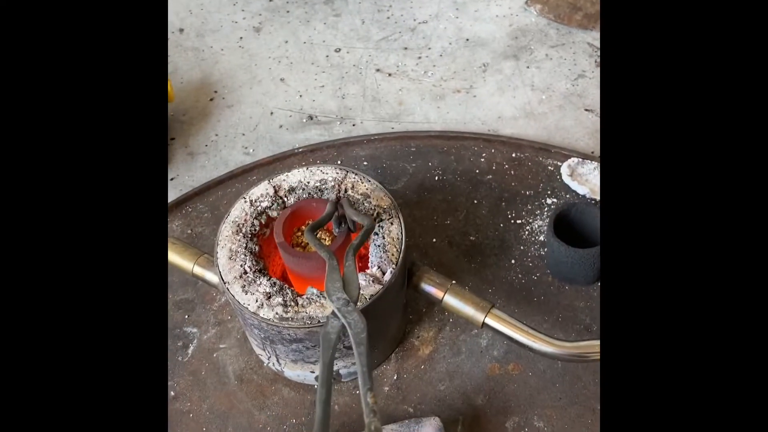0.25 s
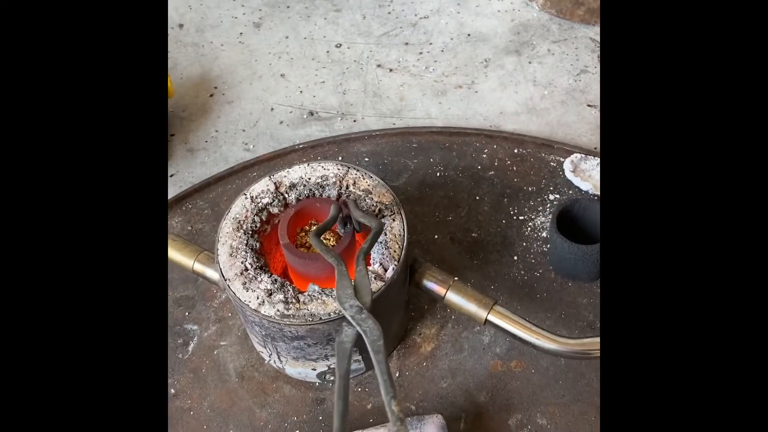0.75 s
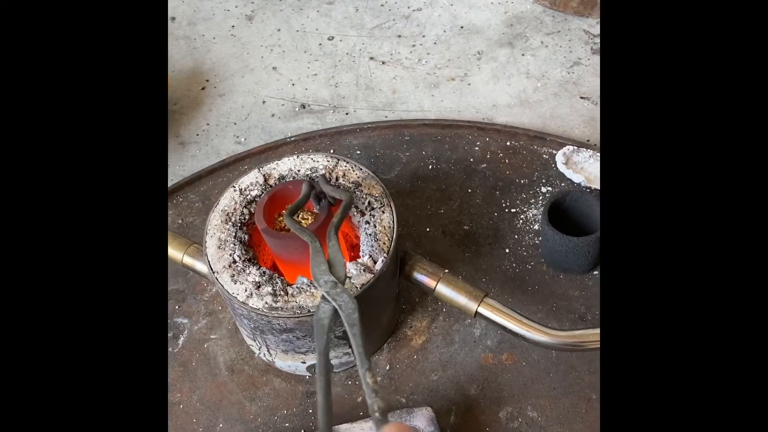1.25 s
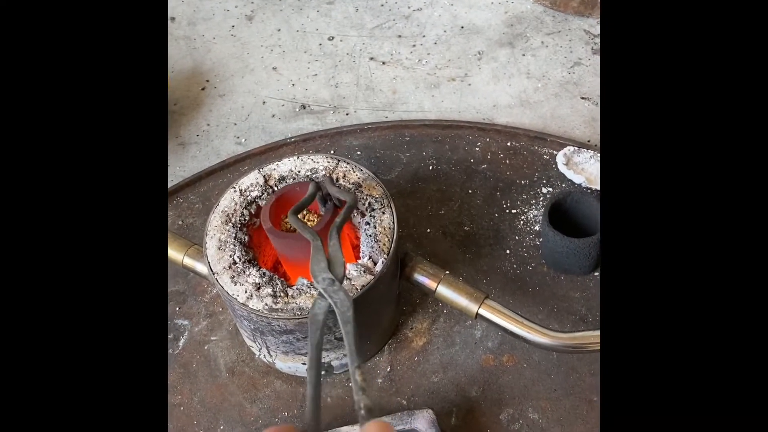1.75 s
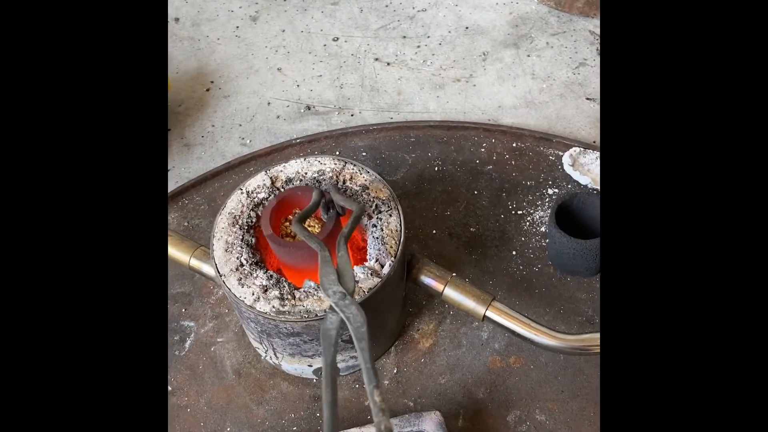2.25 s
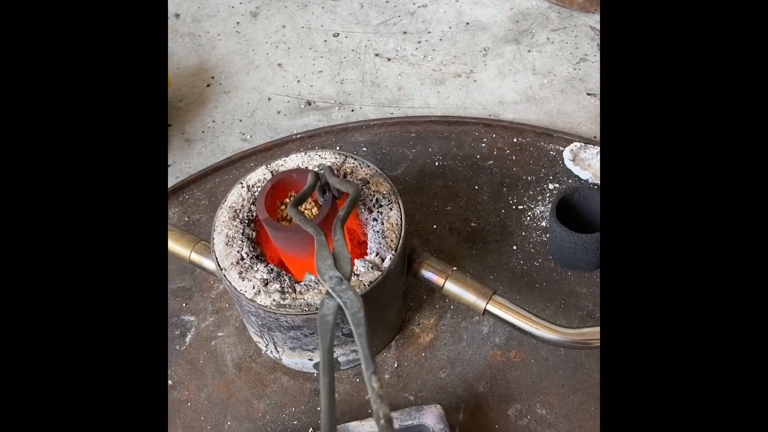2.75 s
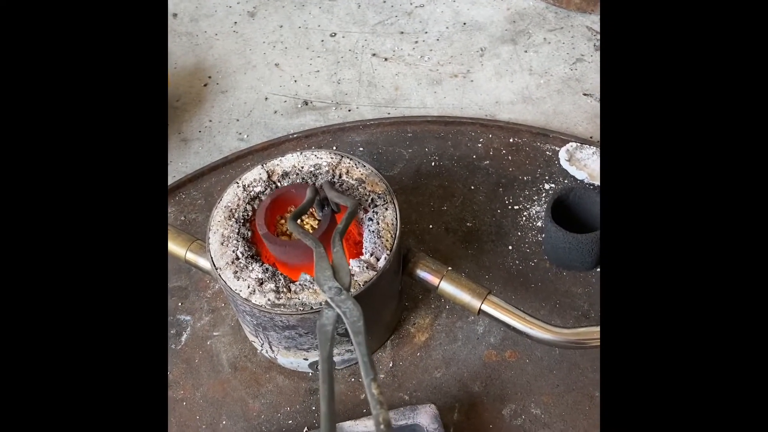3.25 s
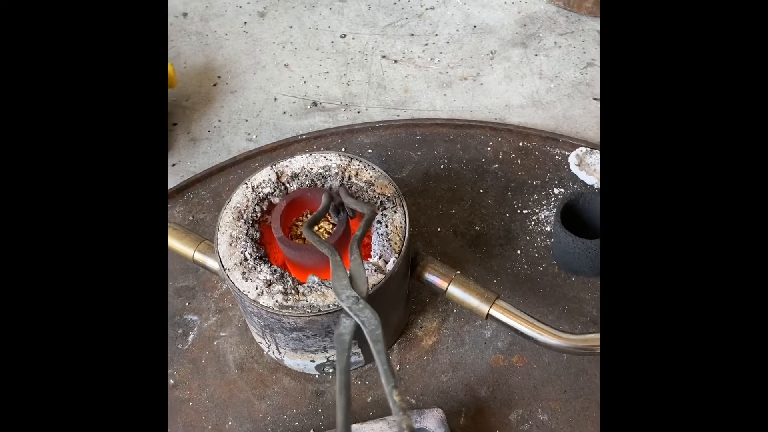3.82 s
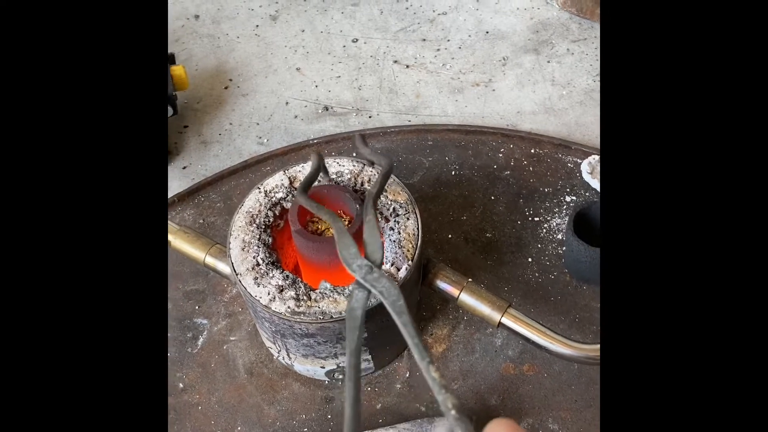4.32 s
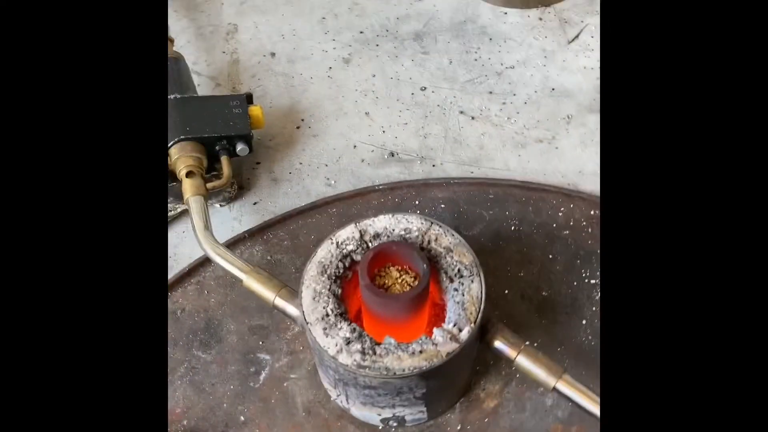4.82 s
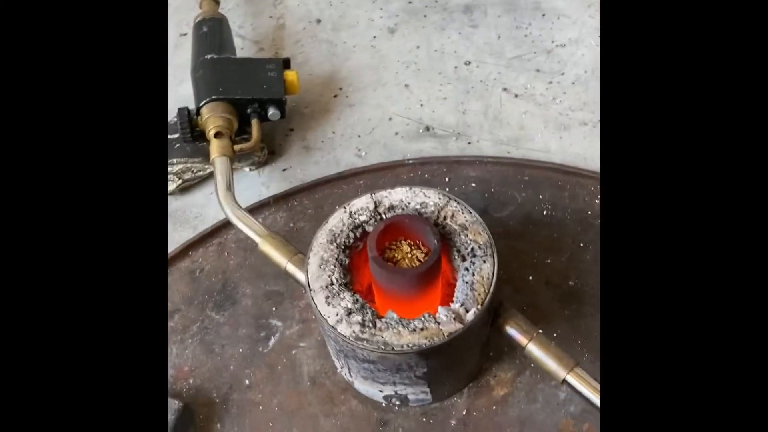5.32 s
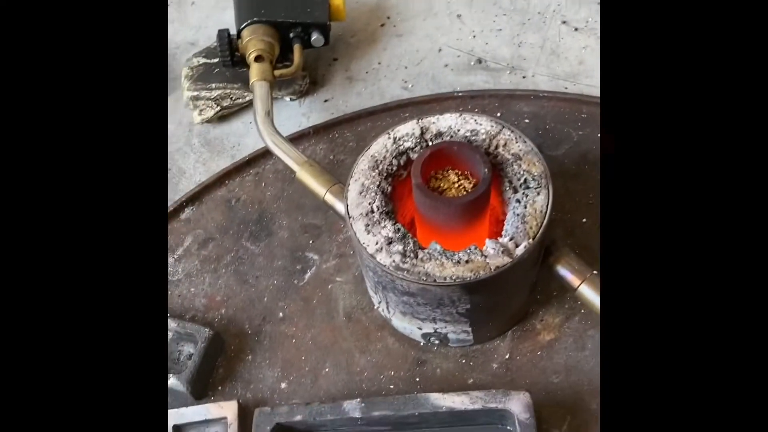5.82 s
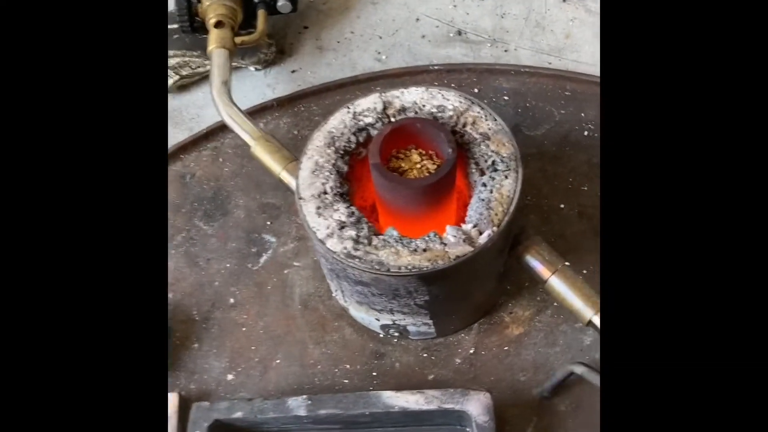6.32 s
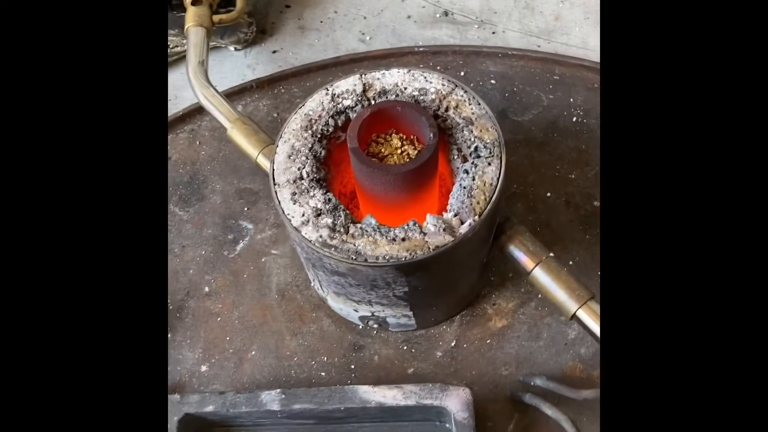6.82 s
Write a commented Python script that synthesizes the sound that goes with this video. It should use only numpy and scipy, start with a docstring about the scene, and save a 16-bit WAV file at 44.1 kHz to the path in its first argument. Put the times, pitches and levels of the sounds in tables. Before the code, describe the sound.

Sparse gritty clicks of metal on clay, an engine droning past outside, then tongs clank down hard and slide on a steel sheet.

```python
"""In a small workshop, close to a gas furnace, steel tongs work at a clay crucible, then drop on a steel sheet.
Contacts are bursts of rough force: filtered they snap, and through damped modes clay, sheet and tongs ring.
Heavy blows thud in the stand; rubbing and sliding are dense clicks; a faint hiss swells and rises in pitch.
Coloured noise is the rumble and roar of flame, traffic and handling; engines drone past outside as unsteady
sines, and a faint tone wavers. Things close by and the walls answer the near sounds at two microphone ports."""
import sys
import numpy as np
from scipy import signal
from scipy.fft import rfft, irfft, next_fast_len
from scipy.io import wavfile

SR = 44100
rng = np.random.default_rng(int(sys.argv[2]) if len(sys.argv) > 2 else 0)


def ratio(d):
    """dB to gain"""
    e = np.asarray(d, float) / 20
    return 10 ** e


def store_wav(level_fs):
    """Save 16-bit WAV to argv[1]."""
    pcm = np.round(np.clip(np.atleast_2d(level_fs), -1, 1) * 32767)
    wavfile.write(sys.argv[1], SR, pcm.T.astype(np.int16))


N = 311787

# modes of the steel sheet and the tongs on it: pitch_hz, level_db, t60_s
STEEL_MODES = [(450, -10, .03), (620, 1, .04), (780, -4, .03), (950, -3, .035), (1165, -2, .035),
               (1310, -5, .03), (1450, -4, .035), (1580, -5, .03), (1712, -6, .035), (1836, -6, .035),
               (2100, -8, .03), (2360, -8, .03), (2740, -7, .025), (3200, -8, .03), (3540, -5, .045),
               (3690, -7, .03), (3866, -6, .035), (4120, -6, .03), (4500, -5, .03), (5170, -8, .02),
               (6310, -3, .025), (6424, 0, .03), (6545, -4, .025), (7200, -3, .03), (8005, -5, .025),
               (8371, -6, .025), (8565, -3, .03), (9243, -4, .03), (9420, -6, .025), (9800, -7, .02),
               (10250, -8, .02)]
# tongs sliding on the sheet: time_s, ringing_slips_db, grit_db
SLIDE_LEVELS = [(5.38, -63, -37.5), (5.45, -60, -46), (5.52, -62, -49.5), (5.58, -47, -40.5),
                (5.7, -48, -52), (5.76, -55, -50.5), (5.87, -59, -62.5), (6.05, -60, -60),
                (6.1, -40.5, -56), (6.17, -50, -46), (6.24, -54.5, -60), (6.31, -51, -58),
                (6.36, -48, -54.5), (6.45, -56.5, -49), (6.63, -41.5, -38), (6.77, -47.5, -49),
                (6.93, -74, -52.5), (7.07, -37, -49)]
# colour of the snap of a contact: pitch_hz, level_db
CRACK_COLOUR = [(300, -11), (1500, -30), (2500, 8), (3400, 13), (4500, 9), (6000, 4), (9000, 6),
                (16000, -9.5)]


def rms_one(x):
    """Scale to unit rms."""
    return x / np.sqrt(np.mean(x ** 2) + 1e-20)


def in_time(rows):
    """Columns of a curve at every sample."""
    s, *columns = np.transpose(rows)
    return [np.interp(np.arange(N) / SR, s, c) for c in columns]


def fade(rows, s):
    """1 while a curve lasts, 0 outside, with ramps of s seconds."""
    t = np.arange(N) / SR
    return np.clip(np.minimum(t - rows[0][0], rows[-1][0] - t) / s, 0, 1)


def filtered(x, response):
    """Multiply the spectrum by response(Hz)."""
    size = next_fast_len(x.shape[-1])
    hz = np.arange(size // 2 + 1) * SR / size + 1  # 1 Hz up, so that a logarithm exists
    return irfft(rfft(x, size) * response(hz), size)[..., :x.shape[-1]]


def at_hz(points, hz):
    """Read a table on a log-frequency axis."""
    table_hz, values = np.transpose(points)
    return np.interp(np.log(hz), np.log(table_hz), values)


def coloured(x, spectrum):
    """Give a sound the colour of a (Hz, dB) table."""
    return filtered(x, lambda hz: ratio(at_hz(spectrum, hz)))


def drift(rate):
    """Slow chance: straight lines between random knots of spread 1, about 2 * rate of them a second."""
    knots = rng.standard_normal(int(N / SR * rate * 2) + 2)
    return np.interp(np.linspace(0, len(knots) - 1, N), np.arange(len(knots)), knots)


def grains(per_s):
    """Dense tiny clicks in clumps."""
    sizes = ratio(3.3 * np.minimum(rng.exponential(1, N), 5)) * rng.choice([-1, 1], N)
    chance = per_s * ratio(4.0 * drift(40)) / SR
    return sizes * (rng.random(N) < chance) + 1e-18


def blows(times, db):
    """One click of either sign for each time."""
    out = np.full(N, 1e-18)
    out[np.round(times * SR).astype(int)] = ratio(db) * rng.choice([-1, 1], len(times))
    return out


def contacts(times, gains, t60s):
    """Each contact is a burst of rough force that swells quickly and dies away."""
    out = np.full(N + SR, 1e-18)
    for s, gain, t60 in zip(times, gains, np.clip(t60s, .002, .2)):
        t = np.arange(int(t60 * SR)) / SR
        shape = (1 - np.exp(-t / (.025 * t60))) * ratio(-60 * t / t60)
        i = round(s * SR)
        out[i:i + len(t)] += gain * rng.standard_normal(len(t)) * shape / shape.max()
    return out[:N]


def ring(force, hz, t60):
    """A damped mode: a unit click sets a sine of starting height 1 ringing."""
    r, w = ratio(-60 / (t60 * SR)), 2 * np.pi * hz / SR
    return signal.lfilter([0, np.sin(w)], [1, -2 * r * np.cos(w), r * r], force)


def favour(hz, favoured_hz):
    """The spot that is hit favours modes near a pitch: up to 12 dB, with a width of .06 in log pitch."""
    return 12 * np.exp(-.5 * (np.log(hz / favoured_hz) / .06) ** 2)


def struck(modes, times, peak_db, t60s, spread_db, favoured_hz=1):
    """Every contact drives every mode with a strength of its own; longer contacts add up in power."""
    # short contacts also deliver one clean blow, a share that fades with their length
    clean_db = 20 * np.log10(0.45 * np.exp(-t60s / 0.046))
    out = 0
    for hz, level_db, t60 in modes:
        db = peak_db + level_db + favour(hz, favoured_hz) + rng.normal(0, spread_db, len(times))
        gains = ratio(db) / np.sqrt(1 + np.minimum(t60s, t60) * SR / 14)
        force = contacts(times, gains, t60s) + blows(times, db + clean_db)
        out = out + ring(force, hz, t60)
    return out


def crack(times, peak_db, t60s, spectrum):
    """The broad snap of the contact itself: one sharp click, then grains about a millisecond long."""
    gritty = ratio(4 * drift(500) - 2)
    force = gritty * contacts(times, ratio(peak_db), t60s)
    click_db = 12  # re the rough force
    force[np.round(times * SR).astype(int)] += ratio(peak_db + click_db)
    return coloured(force, spectrum)


def tongs_on_clay():
    """Ticks and short scrapes: the harder the touch, the less the crucible rings and the brighter the edge."""
    # tongs touching clay: start_s, level_db (before the shares below), hardness (0-1), t60_s
    ticks = [(0.124, -48.5, 0.56, 0.1), (.15, -54, 0.43, .1), (0.226, -54.5, 0.27, 0.13),
             (0.323, -53.5, 0, 0.086), (0.341, -52, 0.34, 0.074), (0.401, -48, .05, 0.054),
             (0.418, -52, .05, 0.048), (0.566, -52, 0.36, 0.14), (0.778, -56, 0.98, 0.041),
             (0.973, -43.5, 0.8, 0.0086), (1.167, -22.5, 0.94, 0.0042), (1.184, -39.5, 0.65, 0.011),
             (1.214, -52, 0.44, 0.14), (1.281, -56, 0.37, 0.16), (1.327, -52, 0.57, 0.18),
             (1.367, -52, 0, 0.071), (1.427, -53, 0.28, 0.041), (1.58, -47.5, 0.86, 0.019),
             (1.648, -36.5, 0.42, 0.062), (1.676, -49, 0.82, 0.09), (1.691, -41, 0.74, 0.13),
             (1.877, -47.5, 0.74, 0.083), (1.936, -50.5, 0.43, 0.12), (2.088, -53.5, 0.52, 0.13),
             (2.246, -29.5, 0.56, 0.024), (2.317, -35, 0.46, 0.044), (2.387, -45.5, 0.78, 0.0085),
             (2.701, -43.5, 0.12, 0.032), (2.805, -39, 0.1, 0.076), (2.813, -26.5, 0.28, 0.036),
             (2.83, -32, 0.47, 0.074), (3.3, -39.5, 0.74, 0.016), (3.354, -28, 0.37, 0.053),
             (3.368, -46, 0.65, 0.088), (3.658, -50.5, 0.74, 0.058), (3.779, -51, 0.5, 0.096),
             (3.843, -53.5, 0.46, .022), (3.97, -22.5, 0.91, 0.0052), (3.99, -48.5, 0.87, .15),
             (4.1844, -31, 0.85, 0.0099), (4.261, -45, 0.97, 0.005), (4.405, -40, 0.9, 0.0043),
             (4.407, -24.5, 1, 0.022), (4.568, -59, 0.68, .015), (4.854, -66, 0.56, 0.015),
             (4.942, -55, 0.63, 0.041), (5.088, -55, 1, .012), (5.2, -55.5, 0.8, 0.019),
             (5.367, -46, 0.76, 0.0075)]
    # modes of the crucible: pitch_hz, level_db, t60_s
    clay_modes = [(640, -11, .02), (820, -9, .025), (1010, -2, .025), (1250, -5, .02), (1520, 1, .025),
                  (1830, -4, .02), (2150, -7, .015), (2450, -8, .015), (3700, -14, .015), (4250, -9, .02)]
    # colour of the bright edge: pitch_hz, level_db
    edge_colour = [(3000, -32), (6500, -28), (9500, 0), (14000, 4), (16000, -5)]
    # light touches at random times while the jaws grip
    faint_count, faint_db, faint_t60_s, grip_ends_s = 8, -67, .12, 5.2
    when, size, hardness = rng.random((faint_count, 3)).T
    faint = np.transpose([when * grip_ends_s, faint_db + 5 * size, 1.1 * hardness, faint_t60_s + 0 * when])
    s, db, hard, t60 = np.vstack([ticks, faint]).T
    hard = np.clip(hard, 0, 1)
    snap_db = db - 15.0 - 8 * hard ** 26  # the hardest touches keep little middle
    edge_db = db + 0.5 - 28 * (1 - hard)
    ring_db = db - 4.5 - 39.5 * hard ** 2.36
    snap = crack(s, snap_db, t60, CRACK_COLOUR)
    edge = crack(s, edge_db, t60, edge_colour)
    return snap + edge + struck(clay_modes, s, ring_db, t60, spread_db=2.0)


def tongs_on_steel():
    """Contacts that set tongs and sheet ringing; where they land decides which modes stand out."""
    # contacts and the steps of their onsets: start_s, level_db (before the shares below),
    # low_ring_db (re level), t60_s, favoured_low_hz, favoured_upper_hz
    clatter = [(5.395, -34, -35, 0.028, 1836, 6424), (5.399, -16.5, -23, 0.046, 2065, 6240),
               (5.404, -6.5, -9, 0.044, 1580, 2740), (5.41, -31, 15, 0.036, 950, 2740),
               (5.451, -18.5, 2, 0.025, 1760, 3863), (5.584, -35, -4, 0.11, 1836, 6424),
               (5.604, -30, 10, 0.085, 1035, 3040), (5.637, -28.5, 0.5, 0.11, 870, 4620),
               (5.676, -33, 9.5, 0.032, 1930, 3600), (5.734, -27.5, -3, 0.037, 1800, 3966),
               (5.783, -36, 6.5, 0.026, 1767, 3780), (5.812, -31, -2.5, 0.025, 595, 3580),
               (5.857, -40.5, -1, 0.078, 1836, 3500), (5.941, -51.5, 7, 0.1, 1880, 3540),
               (5.958, -48, 7, 0.062, 1800, 3500), (6.008, -50, -10, 0.0088, 1450, 9420),
               (6.021, -50, -8, 0.025, 1450, 9420), (6.057, -48, -8, 0.0071, 1450, 9300),
               (6.072, -35.5, 2, 0.061, 1450, 3430), (6.086, -21.5, -34, 0.0014, 1450, 9600),
               (6.097, -40, -5, 0.1, 950, 3540), (6.122, -38, 2, 0.11, 1820, 3500),
               (6.146, -32.5, -4.5, .05, 1450, 10000), (6.213, -44, 8.5, 0.03, 1120, 2740),
               (6.35, -48, -1, 0.29, 1450, 4500), (6.409, -48.5, -14, 0.16, 2360, 2740),
               (6.497, -22, -36, 0.0065, 620, 6460), (6.502, -8.5, -9.5, 0.045, 620, 6370),
               (6.523, -11, 0.5, 0.055, 980, 7750), (6.554, -3, -12.5, 0.044, 1800, 3430),
               (6.582, -6.5, -15.5, 0.03, 1800, 3930), (6.584, -9.5, -13, 0.027, 950, 6330),
               (6.609, -24.5, -8, 0.16, 950, 3850), (6.649, -13, -7, 0.036, 1340, 7070),
               (6.67, -17.5, -15, 0.012, 1836, 3840), (6.718, -19, -17, 0.035, 1836, 7140),
               (6.739, -32.5, -1, 0.036, 1830, 7200), (6.917, -53, 18.5, 0.17, 450, 2740),
               (6.948, -43, 0, 0.31, 1450, 2740), (6.976, -17.5, -4.5, 0.06, 933, 3880),
               (7.001, -24.5, 9, 0.057, 1253, 2720), (7.004, -23, 1.5, 0.0055, 2090, 2630)]
    # colour of the snap: pitch_hz, level_db
    snap_colour = [(300, -13), (1500, -1), (2700, 4.5), (5000, 9.5), (9000, 1), (16000, 3)]
    s, db, low_db, t60, low_hz, upper_hz = np.transpose(clatter)
    chance_db = 3  # spread of mode strength from row to row
    low_modes = [m for m in STEEL_MODES if m[0] < 2500]
    middle_modes = [m for m in STEEL_MODES if 2500 <= m[0] < 5800]
    high_modes = [m for m in STEEL_MODES if m[0] >= 5800]
    low = struck(low_modes, s, db + low_db - 14.0, t60, chance_db, low_hz)
    # the middle modes grow more slowly than the blow
    middle = struck(middle_modes, s, 0.85 * db - 13.5, t60, chance_db, upper_hz)
    high = struck(high_modes, s, db - 18.5, t60, chance_db, upper_hz)
    return crack(s, db - 7.5, t60, snap_colour) + low + middle + high


def tongs_ringing():
    """The tongs ring as damped modes, in strong short parts and faint long ones."""
    # parts of the ringing: start_s, ring_db, snap_db, longest_t60_s, brightness_db_per_octave, favoured_hz
    ring_parts = [(0.567, -63, -62.5, 0.36, 6, 2688), (.606, -64.5, -63, 1, -2.5, 3630),
                  (.628, -62.5, -59.5, 0.62, 0, 2885), (2.842, -43.5, -37.5, 0.051, 3, 4300),
                  (2.849, -45, -52, 0.035, 5, 4300), (2.85, -66, -54, 0.7, 2, 1012),
                  (4.853, -59.5, -71, 0.043, 0.5, 3050)]
    # modes of the tongs: pitch_hz, level_db, t60_s
    tong_modes = [(1012, 0, 1.0), (1300, -7, .6), (1685, -7, .8), (1888, 0, .55), (1960, -6, .6),
                  (2688, 0, .8), (2885, -7, .5), (3052, -1, 1.0), (3560, -7, .4), (3740, -5, .5),
                  (3828, -1, .7), (4300, -7, .5), (4780, -12, .3), (5625, -3, .3), (5820, -6, .25),
                  (6820, -14, .2), (7400, -14, .2)]
    s, _, snap_db, *_ = np.transpose(ring_parts)
    out = crack(s, snap_db, np.full(len(s), 0.071), CRACK_COLOUR)
    click = signal.unit_impulse(SR)
    for start, ring_db, _, longest, tilt_db, favoured_hz in ring_parts:
        i = round(start * SR)
        for hz, level_db, t60 in tong_modes:
            db = ring_db + level_db + tilt_db * np.log2(hz / 3000) + favour(hz, favoured_hz)
            out[i:i + SR] += ratio(db) * rng.choice([-1, 1]) * ring(click, hz, min(t60, longest))
    return out


def stand():
    """Soft low thuds in the stand, the deepest bend of the sheet, and a hollow knock above them."""
    # blows that shake the stand: start_s, level_db (before the shares below), sheet_db and knock_db (re level)
    thuds = [(2.82, -18.5, -10, -11), (2.842, -17.5, -8.5, -9), (2.858, -23, -16, -4), (2.88, -29, -3, 1),
             (3.364, -16.5, -16.5, -10), (3.42, -26.5, -12, -9), (3.794, -31.5, -20, -12),
             (5.409, -26, -0.5, -1), (5.455, -31, -7, -3), (5.495, -38, 7, -8), (5.607, -24, -7, 3),
             (5.637, -27.5, 2.5, 3), (5.655, -28.5, -1, -4), (5.68, -31.5, 2, 2), (5.74, -38.5, 8, 1),
             (5.783, -33, 0, -1), (6.08, -41.5, -1.5, -2), (6.218, -26.5, -16.5, -0.5),
             (6.505, -16, -15.5, -4), (6.527, -23.5, -1.5, -15.5), (6.559, -21.5, -8, 8),
             (6.592, -20, -1.5, -4.5), (6.65, -32, -5, 5.5), (6.918, -21, -13.5, -0.5),
             (6.944, -33, -6, -9), (7.001, -27, -5.5, 9.5)]
    # modes of the stand: pitch_hz, level_db, t60_s
    stand_modes = [(82, -11, 0.25), (114, -2.5, 0.34), (143.3, -13.5, 0.46), (188, -4.5, 0.17),
                   (229.6, -3.5, 0.051)]
    # deepest bend of the sheet: pitch_hz, level_db, t60_s
    sheet_modes = [(297, 0, .16)]
    # modes of the hollow knock: pitch_hz, level_db, t60_s
    knock_modes = [(349, -1.5, 0.08), (388, -2.5, 0.069), (448, -7.5, 0.042), (510, -8, 0.055),
                   (634, -8.5, 0.045)]
    s, db, sheet_db, knock_db = np.transpose(thuds)
    parts = ((stand_modes, db - 7.5), (sheet_modes, db + sheet_db - .6), (knock_modes, db + knock_db - 7.0))
    out = 0
    for modes, peak_db in parts:
        for hz, level_db, t60 in modes:
            push = blows(s, peak_db + level_db + rng.normal(0, 2.82, len(s)))
            # low modes take longer to get going: the swell is counted in cycles (0.65)
            swell_t60 = np.log(1000) * 0.65 / hz
            out = out + ring(push, hz, t60) - ring(push, hz, 1 / (1 / t60 + 1 / swell_t60))
    return out


def drag():
    """Sliding slips shake the modes of the sheet below 4600 Hz in shares that shift as the contact moves."""
    slips = grains(1100)
    rings = 0
    for hz, db, t60 in STEEL_MODES:
        if hz < 4600:
            share = ratio(db + 4 * drift(7))
            rings = rings + share * ring(slips, hz, 1.6 * t60)  # sliding lets modes ring longer
    slips_db, _ = in_time(SLIDE_LEVELS)
    return fade(SLIDE_LEVELS, 0.055) * ratio(slips_db) * rms_one(rings)


def grit():
    """Loose clay crumbs crunch as dense clicks under rubbing jaws, and again while the tongs slide."""
    # jaws rubbing over gritty clay: start_s, length_s, level_db
    rubs = [(0.0, 0.078, -66.5), (0.552, 0.32, -65), (0.942, .36, -71), (1.694, 0.059, -71),
            (1.814, 0.095, -76), (2.237, 0.06, -80), (2.832, 0.068, -66), (4.324, 0.064, -69),
            (4.445, 0.61, -70)]
    # colour of the crunch: pitch_hz, level_db
    grit_colour = [(500, -8), (1500, -8.5), (3000, -0.5), (5000, -6.5), (8000, -16), (16000, -21)]
    attack_s, release_db_per_s, rest_db = 0.0084, 131, -97.5
    t = np.arange(N) / SR
    gain = ratio(rest_db)
    for s, length, db in rubs:
        swell = np.clip((t - s) / attack_s, 0, 1)
        gain = gain + swell * ratio(db - release_db_per_s * np.maximum(t - s - length, 0))
    _, sliding_db = in_time(SLIDE_LEVELS)
    gain = gain + fade(SLIDE_LEVELS, 0.027) * ratio(sliding_db)
    return gain * rms_one(coloured(grains(6000), grit_colour))


def swish():
    """A faint narrow hiss swells, rises in pitch and dies: smooth noise around a gliding centre."""
    peak_s, peak_db, rise_db_per_s, fall_db_per_s = 4.69, -62, 60, 45
    centre_hz, glide_hz_per_s, width_hz = 4450, 1500, 420
    t = np.arange(N) / SR - peak_s
    a, b = filtered(rng.standard_normal((2, N)), lambda hz: 1 / (1 + (hz / width_hz) ** 2))
    turn = 2 * np.pi * (centre_hz * t + glide_hz_per_s * t ** 2 / 2)
    db = peak_db + np.minimum(rise_db_per_s * t, -fall_db_per_s * t)
    return ratio(db) * rms_one(a * np.cos(turn) + b * np.sin(turn))


def reflections(x, t60, db, spectrum):
    """A dying cloud of reflections, another one for each port."""
    t = np.arange(SR // 2) / SR
    tail = rng.standard_normal((2, len(t))) * ratio(-60 * t / t60) * np.clip(t / 0.0017, 0, 1)
    tail /= np.sqrt(np.sum(tail ** 2, axis=1, keepdims=True))
    return ratio(db) * coloured(signal.fftconvolve(x[None], tail, axes=1)[:, :N], spectrum)


def workshop(x):
    """Quick scatter from things close by, then the walls, both as decaying noise clouds."""
    # colour of the scatter close by: pitch_hz, level_db
    bench_colour = [(200, -69), (600, 12), (1800, 10), (2800, 8), (4000, 8.5), (6000, 8), (9000, -14.5),
                    (16000, 18.5)]
    # colour of the walls: pitch_hz, level_db
    wall_colour = [(100, -25), (400, 5.5), (1000, 0), (2000, 2), (4000, -9), (7000, -4.5), (10000, -11),
                   (16000, -37)]
    return reflections(x, 0.012, -18, bench_colour) + reflections(x, 0.3, -7, wall_colour)


def rumble_and_roar():
    """Flame, passing traffic and handling as lumpy coloured noise, partly separate at the two ports."""
    # background in time, low rumble and broad roar: time_s, rumble_db, roar_db (both before the lifts below)
    background_levels = [(0.0, -53.5, -70), (0.43, -49, -73.5), (0.77, -58, -71.5), (1.09, -55.5, -71),
                         (1.4, -50.5, -63), (1.8, -52, -63), (2.3, -55, -62), (2.75, -64, -65.5),
                         (3.0, -58.5, -66.5), (3.7, -62.5, -64), (4.05, -61.5, -65.5), (4.5, -63, -66.5),
                         (4.89, -63, -64.5), (5.2, -61, -67.5), (5.62, -52, -61.5), (6.26, -49, -61.5),
                         (6.6, -61, -54), (7.07, -56, -66)]
    # colour of the rumble: pitch_hz, level_db
    rumble_colour = [(20, -33.5), (32, -16), (45, 6), (65, 7.5), (120, 1.5), (200, -24), (300, -49)]
    # colour of the roar and hiss: pitch_hz, level_db
    roar_colour = [(80, -7), (130, 7.5), (180, 3.5), (240, -0.5), (330, -2), (500, -6.5), (1000, -13),
                   (1700, -19), (2600, -28), (4500, -35), (6000, -52), (9000, -41.5), (16000, -54)]
    # share of the noise power that arrives alike at both ports: pitch_hz, share (0-1)
    alike_share = [(40, 0), (150, 0.97), (400, 1), (900, 0), (2400, 0.03), (6000, 0.74), (9000, 0.9),
                   (15000, 0.6)]

    def alike(hz):
        return np.clip(at_hz(alike_share, hz), 0, 1)

    rumble_db, roar_db = in_time(background_levels)
    rumble_db = rumble_db + 5.5 + 2.7 * drift(5.9) + 0.81 * drift(5.3)
    roar_db = roar_db + 10 + 1.9 * drift(6)
    out = 0
    for spectrum, db in ((rumble_colour, rumble_db), (roar_colour, roar_db)):
        shared, left, right = rng.standard_normal((3, N))
        common = filtered(shared, lambda hz: np.sqrt(alike(hz)))
        own = filtered(np.array([left, right]), lambda hz: np.sqrt(1 - alike(hz)))
        out = out + ratio(db) * rms_one(coloured(common + own, spectrum))
    return out


def engine(rows, order):
    """Three neighbouring multiples of a turning rate as unsteady sines, fading in and out with the pass."""
    hz, db, next_db = in_time(rows)
    turn = 2 * np.pi * np.cumsum(hz) / SR
    third_db = next_db - 10.5 + 5 * drift(4)
    out = 0
    for k, order_db in enumerate((db, next_db, third_db)):
        gain = np.sqrt(2) * ratio(order_db + 3.8 * drift(12))
        out = out + gain * np.sin((order + k) * turn + 0.4 * drift(16))
    return fade(rows, 0.1) * out


def passing_engines():
    """A nearer engine and then a farther one drone past, each a stack of low orders."""
    # nearer engine: time_s, turning_rate_hz, lowest_order_db, next_order_db
    near_pass = [(0.7, 97, -54.5, -75), (0.92, 98.1, -45.5, -91), (1.13, 101, -52, -86),
                 (1.32, 105.4, -37, -70), (1.5, 106.4, -44, -71), (1.7, 107.7, -39, -52.5),
                 (1.79, 109.2, -51.5, -52.5), (1.93, 111.8, -41, -47.5), (2.05, 114.6, -36.5, -52.5),
                 (2.12, 117, -39, -51), (2.25, 120.1, -42, -45.5), (2.34, 119.6, -32.5, -54.5),
                 (2.52, 119, -41.5, -59.5), (2.61, 113, -54.5, -61), (2.68, 106.9, -45, -58.5),
                 (3.0, 99.46, -42, -55.5), (3.33, 96.7, -49, -90)]
    # farther engine: time_s, turning_rate_hz (sounding from twice this), lowest_order_db, next_order_db
    far_pass = [(3.75, 33.35, -46, -54), (3.85, 34.53, -47.5, -51.5), (3.96, 35.9, -57, -59),
                (4.11, 38.87, -50.5, -50), (4.28, 41.9, -47.5, -57.5), (4.48, 42.44, -66, -53.5),
                (4.72, 42.26, -59, -63.5), (4.84, 40.55, -65, -52), (5.2, 41.2, -55, -55.5),
                (5.36, 40.9, -74, -38.5)]
    return engine(near_pass, order=1) + engine(far_pass, order=2)


def hum():
    """A faint tone wavers and fades: a sine with drifting level and phase."""
    # time_s, pitch_hz, level_db
    tone = [(0.04, 371.5, -72), (0.2, 370, -67.5), (0.38, 363, -70)]
    hz, db = in_time(tone)
    gain = fade(tone, 0.019) * np.sqrt(2) * ratio(db + 1.5 * drift(11.0))
    return gain * np.sin(2 * np.pi * np.cumsum(hz) / SR + 0.34 * drift(16))


def scene():
    """Everything at the two microphone ports."""
    near = tongs_on_clay() + tongs_on_steel() + tongs_ringing() + stand() + drag() + grit() + swish()
    return near + workshop(near) + rumble_and_roar() + passing_engines() + hum()


def top_cut(x):
    """Nothing passes above the cut-off."""
    return signal.sosfilt(signal.butter(12, 16990, fs=SR, output="sos"), x)


def record(dry):
    """Peaks are rounded, phase and level shift between the sides, and the treble is shaped."""
    # phase by which the left port leads: pitch_hz, lead_radians
    port_lead = [(0, 0), (300, -.4), (780, -2.2), (1030, -1.7), (1400, -.1), (1810, -0.3), (2410, -2.6),
                 (4480, -4.0), (4740, -3.3), (5770, -2.9), (7750, -0.3), (9130, 0.1), (11000, 2.9),
                 (12900, 3.5), (14000, 6.2), (16500, 6.5)]
    # level by which the left port is louder: pitch_hz, level_db
    port_lean = [(100, -0.5), (400, .5), (600, -3.5), (950, -6), (1400, -3), (1900, -1), (8000, 0)]
    # overall colour of both sides, with a gap near 12 kHz: pitch_hz, level_db
    overall_colour = [(25, -7), (50, 1), (10500, 0), (11200, 8), (12300, -26), (13000, -4.5), (15700, -10),
                      (16300, -59), (17000, -65)]
    top = .8  # no peak passes this height when rounded
    rounded = top * np.tanh(dry / top)
    lead_hz, lead = np.transpose(port_lead)
    sides = np.array([[.5], [-.5]])  # half of each difference goes to either side

    def between_ports(hz):
        return np.exp(1j * np.interp(hz, lead_hz, lead) * sides) * ratio(at_hz(port_lean, hz) * sides)

    mix = coloured(filtered(rounded, between_ports), overall_colour)
    return top_cut(mix)


dry = scene()
out = record(dry)
store_wav(out)
```